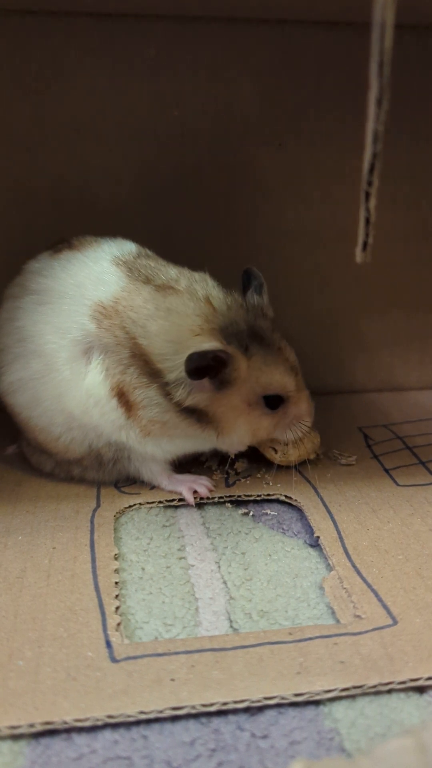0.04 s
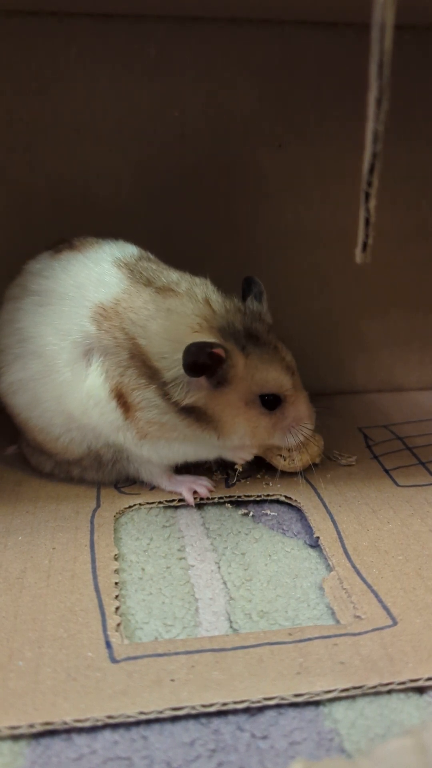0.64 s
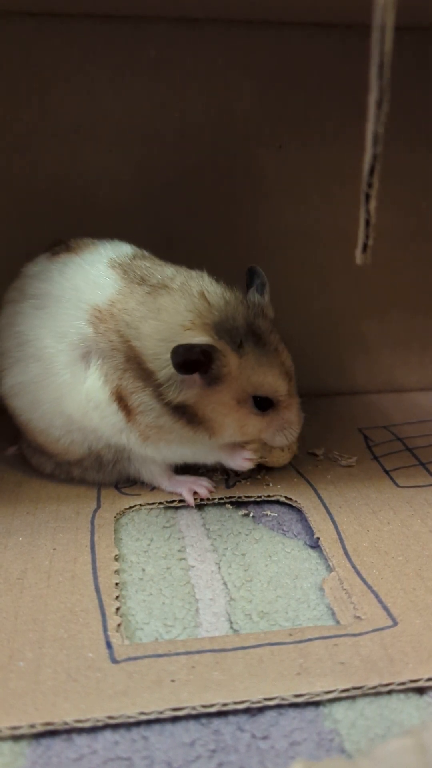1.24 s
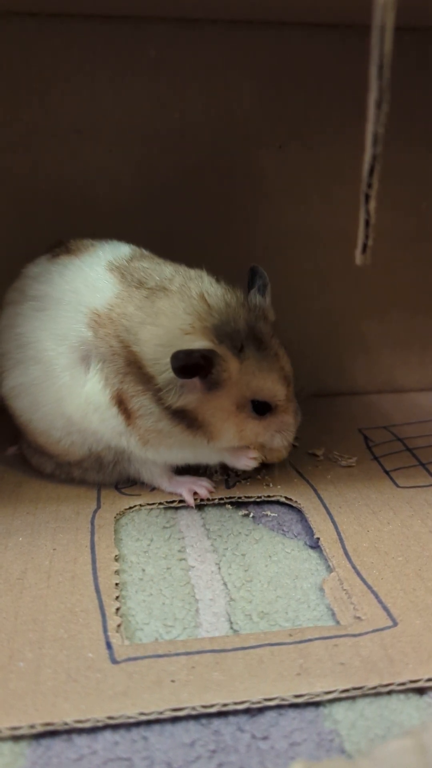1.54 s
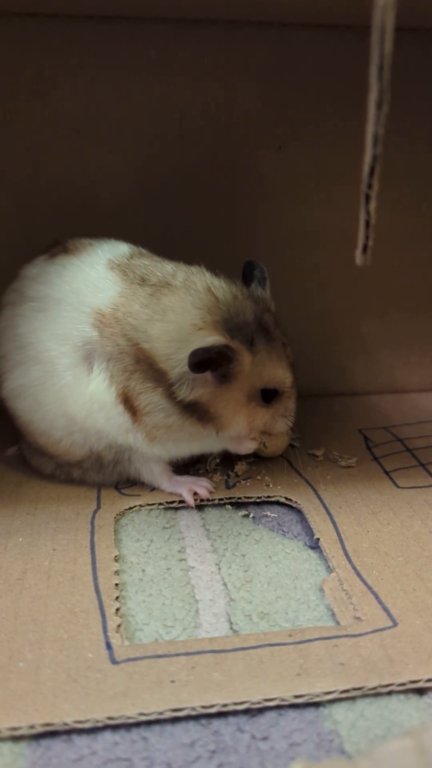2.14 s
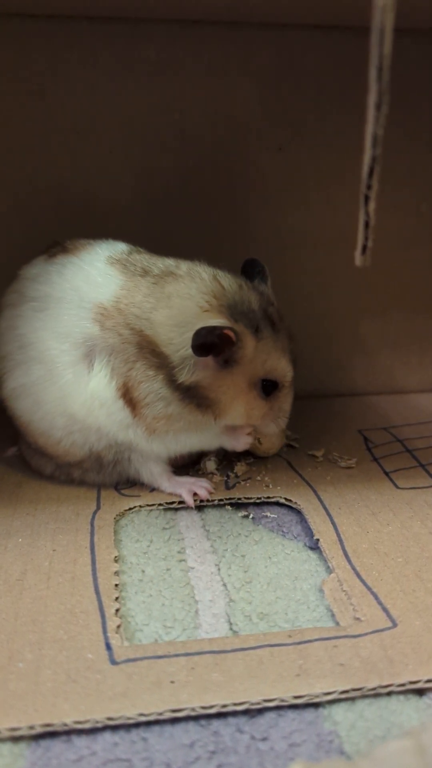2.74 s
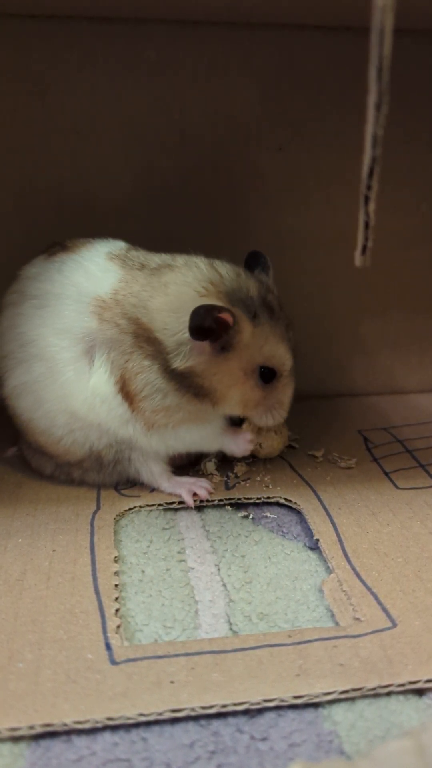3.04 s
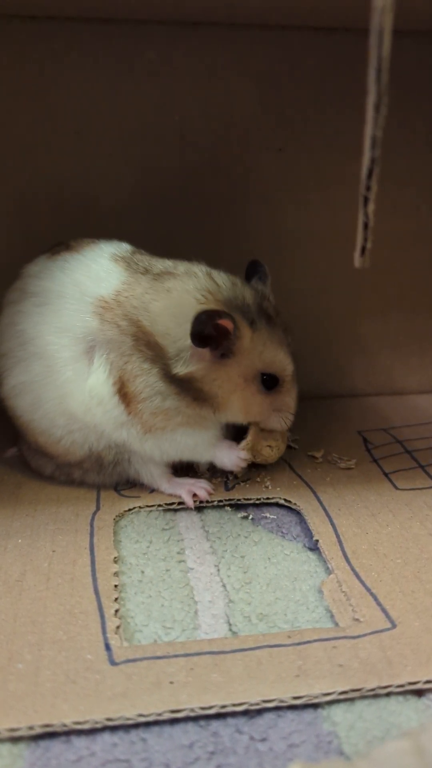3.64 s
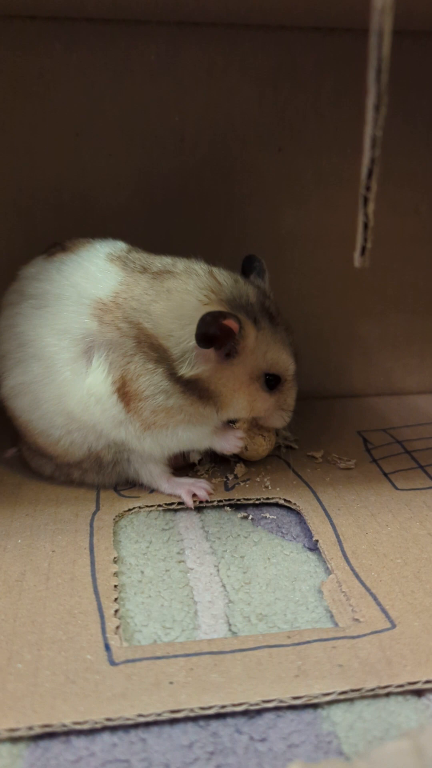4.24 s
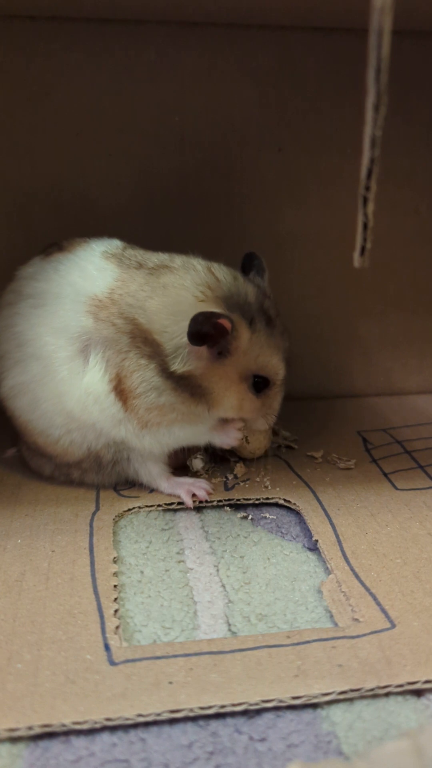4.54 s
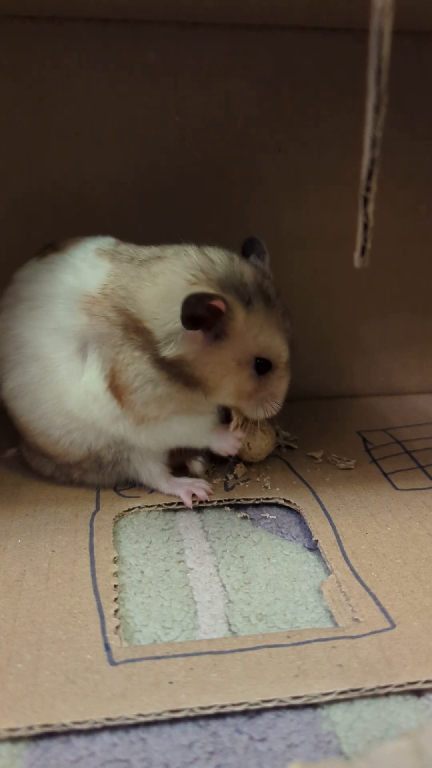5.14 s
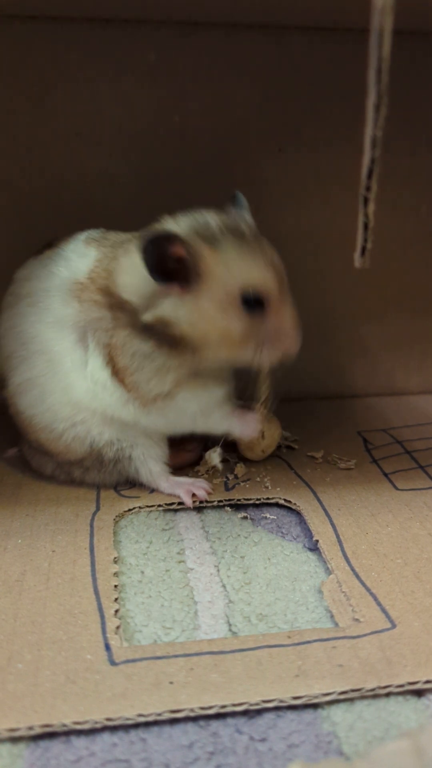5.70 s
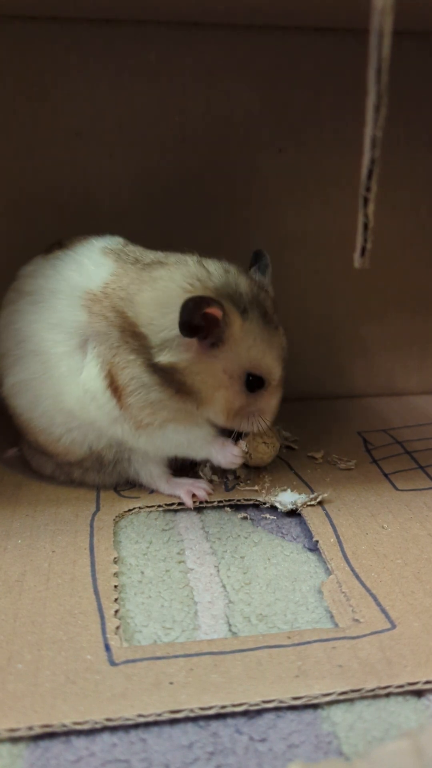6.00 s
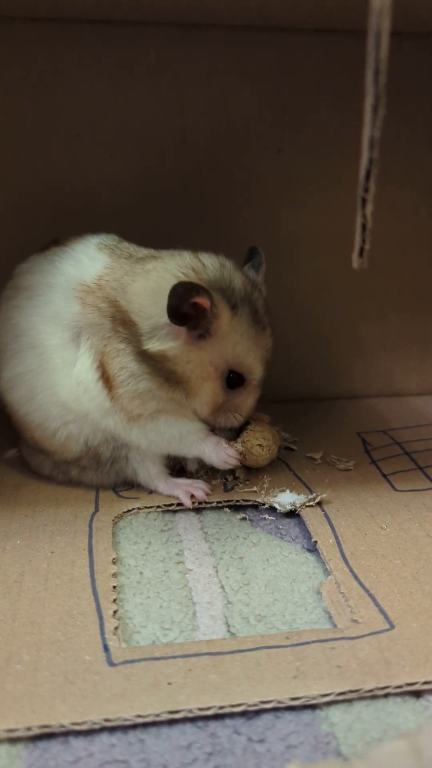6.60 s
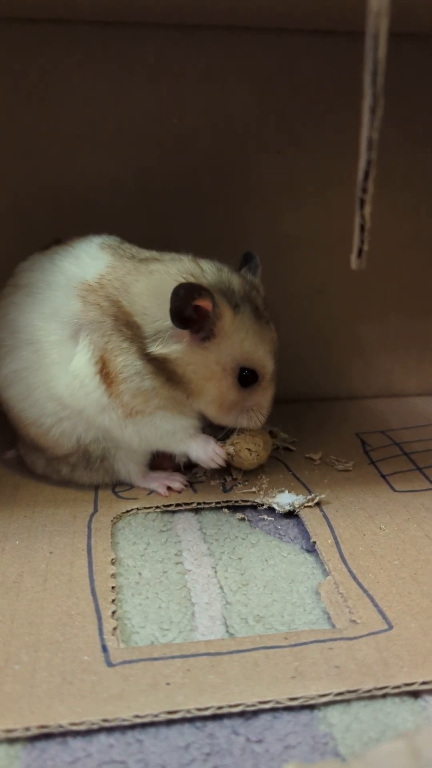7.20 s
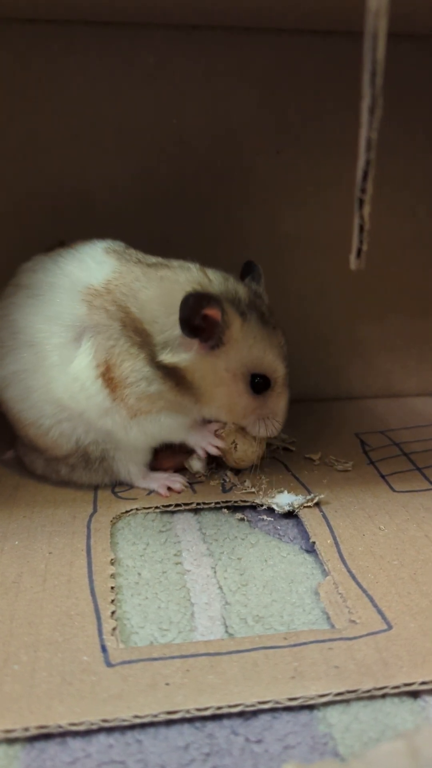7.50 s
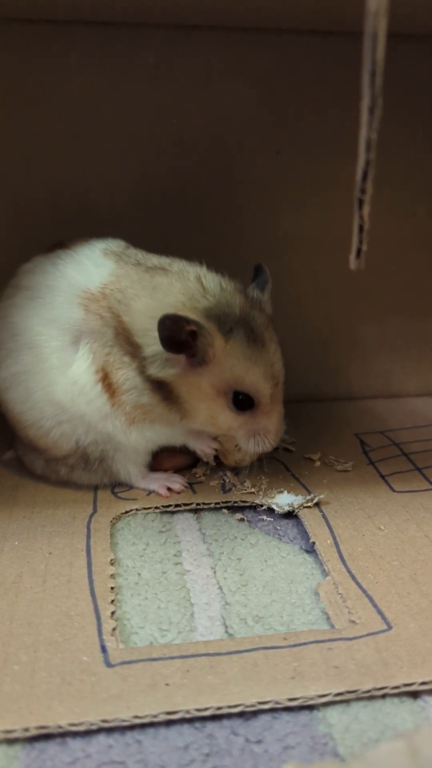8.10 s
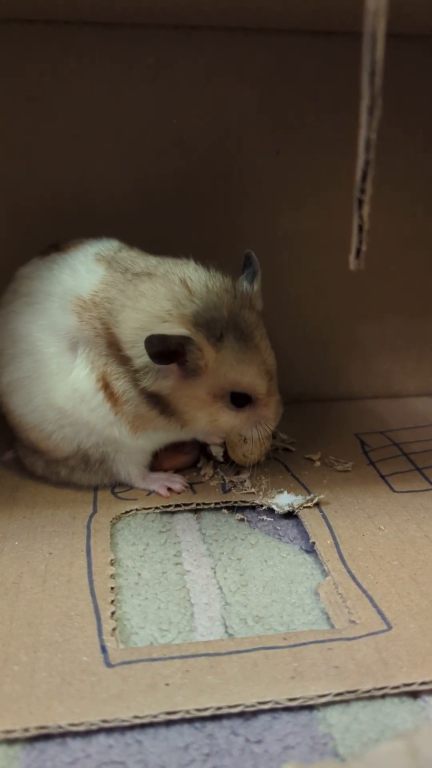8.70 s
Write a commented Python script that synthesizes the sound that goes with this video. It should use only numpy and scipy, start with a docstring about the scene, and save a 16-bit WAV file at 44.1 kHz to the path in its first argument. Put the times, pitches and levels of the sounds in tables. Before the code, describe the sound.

A hamster gnaws a peanut shell inside a cardboard box, close to the microphone. Quick, irregular cracks and crunching clicks mix with light tooth scrapes and soft knocks of the nut on the cardboard. A little past halfway comes the loudest snap with a thump, then the nibbling turns sparser, with scuffs and taps. A faint low hum fills the quiet room.

```python
"""A hamster gnaws a peanut inside a cardboard box, close to a two-port microphone in a quiet room.
Brittle fracture under its teeth excites the shell's resonances as cracks, rasps and crumbs.
The nut rubs and knocks on the floor, driving the cardboard's bending modes, and the animal's
shifting weight makes the lowest modes rumble. Box and room add short reflections,
and a gentle gain control lowers the level after loud snaps."""
import sys
import numpy as np
from scipy import signal
from scipy.fft import rfft, irfft, next_fast_len
from scipy.io import wavfile
from scipy.ndimage import uniform_filter1d

SR = 44100
rng = np.random.default_rng(int(sys.argv[2]) if len(sys.argv) > 2 else 0)


def wrap_up_sound(samples):
    """Save the sound to the file named by the first command line argument, as 16-bit audio."""
    columns = np.atleast_2d(samples).T
    # keep every value between -1 and 1, then stretch to whole-number steps
    tamed = np.clip(columns, -1, 1)
    steps = np.round(tamed * 32767).astype(np.int16)
    wavfile.write(sys.argv[1], SR, steps)


N = 394694
FFT_SIZE = next_fast_len(N, real=True)


def from_db(db):
    """Decibels to amplitude ratio."""
    return 10 ** (np.asarray(db) / 20)


def rms_one(x):
    """Normalisation to unit rms."""
    return x / np.sqrt(np.mean(x ** 2) + 1e-20)


def at_hz(points, hz):
    """Interpolation on a log-frequency axis."""
    f, value = np.transpose(points)
    return np.interp(np.log(hz + 1e-9), np.log(f), value)


def cut(x, hz, kind, order=2):
    """Butterworth filtering."""
    sections = signal.butter(order, np.clip(hz, 10, SR * 9 / 20), kind, fs=SR, output="sos")
    return signal.sosfilt(sections, x + 1e-18)


def resonate(x, resonances):
    """Modal superposition: damped resonators in parallel, with alternating signs."""
    out = 0
    for k, (hz, width, db) in enumerate(resonances):
        r = np.exp(-np.pi * width / SR)
        poles = [1, -2 * r * np.cos(2 * np.pi * hz / SR), r * r]
        ring = (1 - r * r) / 2 * signal.lfilter([1, 0, -1], poles, x + 1e-18)
        out = out + (-1) ** k * from_db(db) * ring
    return out


def evened(x, span_s):
    """Normalisation of the running rms, keeping the faster detail."""
    size = max(int(span_s * SR), 3)
    power = uniform_filter1d(uniform_filter1d(np.mean(np.atleast_2d(x) ** 2, axis=0), size), size)
    return x / np.sqrt(np.maximum(power, 0) + 1e-5 * np.mean(x ** 2))


def add(track, start_s, sound):
    """Superposition of a sound on a track."""
    i = max(round(start_s * SR), 0)
    track[..., i:i + sound.shape[-1]] += sound[..., :N - i]


def grains(per_s, spread_db):
    """Poisson process: random impulses, mostly small, a few large."""
    clicks = np.zeros(N)
    chance, size, sign = rng.random((3, N))
    born = chance < per_s / SR
    size_db = spread_db * np.minimum(-np.log(size[born] + 1e-9), 4)
    clicks[born] = from_db(size_db) * np.sign(sign[born] - .5)
    return clicks


# Background spectrum: (frequency [Hz], relative spectral level [dB])
ROOM_SPECTRUM = [(25, -22), (55, -3.5), (90, -8.5), (140, -13.5), (220, -31.5), (420, -24.5), (750, -34),
                 (1300, -35.5), (2200, -33), (4000, -40.5), (8000, -44), (16000, -49)]

def room_tone(level_db=-76.5, coherent_hz=900):
    """Diffuse field: the faint room noise is coherent between the ports only at long wavelengths."""
    hz = np.arange(FFT_SIZE // 2 + 1) * SR / FFT_SIZE
    mid, side = rfft(rng.standard_normal((2, FFT_SIZE))) * from_db(at_hz(ROOM_SPECTRUM, hz))
    coherence = 1 / (1 + (hz / coherent_hz) ** 2)
    tone = irfft(np.sqrt(1 + coherence) * mid + np.sqrt(1 - coherence) * side * [[1], [-1]], FFT_SIZE)
    return from_db(level_db) * rms_one(tone[:, :N])


# Bouts of gnawing and handling: (start [s], duration [s], load on the floor [dB])
ACTIVITY = [(0.0, 1.7, -58), (1.74, 1.663, -60), (3.69, 1.09, -60), (4.853, 0.42, -59.5), (5.36, 0.3, -66),
            (5.71, 0.25, -62.5), (6.333, 0.14, -72), (6.778, 0.21, -61), (7.46, 0.61, -61),
            (8.32, 1.03, -61.5)]

def bouts(levels_db, attack_s=.02, release_s=.029):
    """Amplitude envelope: each bout rises linearly, holds and decays exponentially."""
    t = np.arange(0, N, 44) / SR
    shapes = []
    for (start, length, _), db in zip(ACTIVITY, levels_db):
        rise = np.clip((t - start) / attack_s + .5, 0, 1)
        decay = np.exp(-np.maximum(t - start - length, 0) / release_s)
        shapes.append(from_db(db) * rise * decay)
    return np.interp(np.arange(N) / SR, t, np.max(shapes, axis=0))


# Work on the nut: (time [s], rubbing on cardboard [dB], teeth on shell [dB], rustle [dB])
WORK_LEVELS = [(0.0, -68, -71.5, -98), (0.97, -71.5, -75, -94.5), (1.12, -76, -75, -89),
               (1.54, -75, -76.5, -98), (1.72, -73, -77, -99), (2.22, -82.5, -80, -101),
               (2.44, -75.5, -71.5, -85.5), (3.24, -71, -76.5, -94), (3.49, -89, -81.5, -101),
               (4.01, -79, -91.5, -100), (4.41, -75.5, -86, -99), (4.88, -85.5, -94, -100),
               (5.08, -69, -86, -96.5), (5.53, -84, -91, -99), (5.86, -72, -88.5, -100),
               (6.11, -91, -100, -101), (6.81, -81.5, -99, -101), (6.98, -66, -95, -96.5),
               (7.23, -85.5, -110, -104.5), (7.9, -72, -80.5, -90), (8.13, -79.5, -93, -100),
               (8.95, -74.5, -77.5, -100.5)]

def effort(rest_db=-9):
    """Amplitude modulation: gains of rubbing, teeth and rustle; the first two ease between bouts."""
    times, *curves_db = np.transpose(WORK_LEVELS)
    rubbing, teeth, rustle = (from_db(np.interp(np.arange(N) / SR, times, db)) for db in curves_db)
    busy = np.maximum(bouts(np.zeros(len(ACTIVITY))), from_db(rest_db))
    return busy * rubbing, busy * teeth, rustle


# Resonances of the nut's cavity, wall and fibres: (frequency [Hz], bandwidth [Hz], gain [dB])
HOLLOW_MODES = [(744, 360, -5.5), (1250, 240, -2.5), (1740, 290, -2)]
WALL_MODES = [(2240, 380, 3), (2780, 650, 1.5), (3137, 1000, 0), (3690, 430, -2.5), (4830, 790, -12)]
SNAP_MODES = [(4850, 350, -1), (6600, 2000, -6), (8500, 1300, 1), (11500, 4700, -1), (13500, 2600, 1.5)]

def shell_parts(force, grip=1):
    """Forced vibration: the nut's hollow, wall and fibres respond; the grip scales their frequencies."""
    parts = (HOLLOW_MODES, WALL_MODES, SNAP_MODES)
    return np.array([resonate(force, np.array(modes) * [grip, 1, 1]) for modes in parts])


def radiated(parts, bands_hz=((650, 1850), (1850, 3850), (4000, 19000))):
    """Band-limited radiation: hollow, wall and fibres each sound mainly in their own range."""
    return [cut(x, band, "band") for x, band in zip(parts, bands_hz)]


def grit(per_s, spread_db, hollow_db):
    """Microfracture: a stream of tiny breaks excites the shell's body and its bright fibres."""
    hollow, wall, snap = (evened(x, .033) for x in radiated(shell_parts(grains(per_s, spread_db))))
    return rms_one(wall + from_db(hollow_db) * hollow), snap


def rasp(teeth, rustle, rustle_db=-4.5):
    """Friction noise: teeth and claws rub lightly on the shell while the nut is held."""
    body, snap = grit(per_s=6600, spread_db=6, hollow_db=-4.5)
    return teeth * body + rustle * from_db(rustle_db) * cut(snap, 5200, "high")


# Bending modes of the floor in low, middle and high groups:
# (frequency [Hz], gain [dB], free decay T60 [s], right minus left [dB])
CARDBOARD_MODES = [
    [(193, -3, 0.2, 2.5), (263.5, -1.5, 0.25, 1)],
    [(325, -1, 0.15, 0.5), (451, 2, 0.092, 3.5), (469.7, -3, 0.029, 1.5), (571, -3.5, 0.093, -0.5)],
    [(665, -5.5, 0.062, -2), (727.3, 1, 0.1, -0.5), (763.5, 3.5, 0.061, 7.5), (913.7, -7.5, .06, 6),
     (947, -5.5, 0.075, 9.5), (1130, -21, 0.05, -3.5), (1490, -22, 0.06, 2)],
]

def scuffs(rubbing, level_db=6, damping=1.5, db_per_octave=-5, soft_hz=2400):
    """Stick-slip friction: dragging nut and paws excite the floor's modes, damped by the contact."""
    out = np.zeros((2, N))
    slips = cut(grains(per_s=130, spread_db=5.5), soft_hz, "low")
    for k, (hz, db, t60, right_db) in enumerate(sum(CARDBOARD_MODES, [])):
        width = damping * np.log(1000) / (np.pi * t60)
        ring = resonate(slips, [(hz, width, db + db_per_octave * np.log2(hz))])
        out += (-1) ** k * from_db(np.array([[-1], [1]]) * right_db / 2) * ring
    return rubbing * from_db(level_db) * evened(out, .08)


# Lowest floor modes: (frequency [Hz], bandwidth [Hz], gain [dB])
SWAY_MODES = [(53.9, 7.7, 3), (79.6, 35, -0.5)]
DRUM_MODES = [(136.3, 22, 0)]
# A paw or the body comes down: (time [s], sway level [dB], drum level [dB])
FOOTFALLS = [(0.13, -52.5, -74), (0.17, -72, -48), (0.34, -62, -48.5), (0.541, -66.5, -50),
             (0.77, -65, -49.5), (0.9, -50.5, -58), (2.198, -58.5, -51.5), (2.84, -50.5, -47),
             (2.949, -55.5, -65), (3.218, -58, -50), (3.7, -53.5, -58), (4.229, -63, -60),
             (4.44, -52.5, -72), (4.62, -51, -74), (5.14, -43.5, -53.5), (5.259, -69, -52),
             (5.91, -71, -57), (7.019, -48.5, -46), (7.679, -57.5, -56.5), (8.11, -45, -62),
             (8.51, -72, -48)]

def rumble(load_db=(2, -1.5), rest_db=(-75, -89), apart_db=-16.5, rise_s=.029):
    """Random forcing: the moving animal drives the floor's sway and drum modes, more at each step."""
    t = np.arange(SR // 3) / SR
    steps = np.zeros((2, N))
    for start, *levels in FOOTFALLS:
        add(steps, start, np.outer(from_db(levels), t / rise_s * np.exp(1 - t / rise_s)))
    load = bouts([db for _, _, db in ACTIVITY])
    moving = np.maximum(np.outer(from_db(load_db), load), from_db(rest_db)[:, None])
    sway_gain, drum_gain = np.hypot(moving, steps)
    common, apart, taps = rng.standard_normal((3, N))
    push = common + from_db(apart_db) * apart * [[1], [-1]]   # slightly unlike at the two ports
    sway = cut(cut(resonate(push, SWAY_MODES), 39, "high", order=4), 120, "low", order=4)
    drum = cut(cut(resonate(taps, DRUM_MODES), 90, "high"), 130, "low", order=3)
    return sway_gain * evened(sway, .057) + drum_gain * evened(drum, .15)


def crumbs(teeth, level_db=13.5, snap_db=-28.5, break_s=.006):
    """Acoustic emission: flakes break off at random, louder the harder the teeth work."""
    t = np.arange(SR // 25) / SR
    bursts = signal.fftconvolve(np.abs(grains(per_s=12, spread_db=6)), np.exp(-t / break_s))[:N]
    hollow, wall, snap = radiated(shell_parts(bursts * rng.standard_normal(N)))
    return teeth * from_db(level_db) * (hollow + wall / 2 + from_db(snap_db) * snap)


def knock_levels(db, hardness_db, low_db=-6.5, low_loss=.2):
    """Contact stiffness: of the low, middle and high modes, a hard contact favours the high."""
    return db + low_db - low_loss * hardness_db, db, db + hardness_db


# The nut strikes the floor: (time [s], level [dB], hardness as high-mode boost [dB])
NUT_IMPACTS = [(0.1207, -62.5, 9.5), (0.1735, -55.5, 4.5), (0.234, -72, 26), (0.3286, -63.5, 6.5),
               (0.3771, -67.5, 14.5), (0.4305, -57.5, -5), (0.768, -62, -3), (0.822, -57, 12.5),
               (0.961, -60, 7.5), (1.2575, -61, -5.5), (1.3413, -54, -1), (1.3945, -61, -1.5),
               (1.5118, -53.5, 3.5), (1.6239, -46, -3), (1.926, -66, -7), (2.2003, -63, -5.5),
               (2.2533, -59.5, 4.5), (2.398, -57.5, -9), (2.4736, -67.5, -3), (2.5461, -63, 5),
               (2.7953, -53, 0), (2.844, -41.5, -6), (3.0541, -68, 11.5), (3.1961, -66, 10.5),
               (3.697, -59.5, -6.5), (3.796, -68, -5), (3.9962, -69, -0.5), (4.112, -66, 3),
               (4.223, -63.5, 0.5), (4.3894, -61, -6), (4.5455, -58, -4.5), (4.8656, -55, -3),
               (5.1169, -31.5, 5), (5.2557, -51.5, 3.5), (5.559, -71.5, 0), (5.7106, -57, -6.5),
               (5.9086, -57.5, -2), (5.9597, -64.5, 7.5), (6.7855, -65.5, -6), (6.9092, -57.5, -1.5),
               (7.0236, -41, -1), (7.4646, -54.5, -6.5), (7.6727, -59, -0.5), (8.111, -60, -1.5),
               (8.3147, -43, 0), (8.51, -53.5, 3)]

def knocks(vary_db=3.5, build_s=.0006, trim_db=(-.3, -.3, -.5), crush_db=-6, crush_s=.015):
    """Impact excitation: the cardboard crushes with a thud and rings, differently at each spot."""
    t = np.arange(SR // 5) / SR
    onset = 3 * SR // 100   # the first 30 ms set the level
    out = np.zeros((2, N))
    for group, modes in enumerate(CARDBOARD_MODES):
        hz, db, t60, right_db = np.transpose(modes)
        rings = np.exp(2j * np.pi * np.outer(hz, t)) * from_db(-60 * t / t60[:, None])
        rings *= 1 - np.exp(-t / build_s)   # the bending wave needs time to spread
        sides = from_db(np.outer([-1, 1], right_db) / 2)
        crushes = rng.standard_normal((len(NUT_IMPACTS), len(t))) * np.exp(-t / crush_s)
        thuds = cut(crushes, (hz.min(), hz.max()), "band")
        for (start, knock_db, hardness_db), thud in zip(NUT_IMPACTS, thuds):
            strength, phase = rng.standard_normal((2, len(hz)))
            weights = sides * from_db(db + vary_db * strength) * np.exp(1j * phase / 2)
            ringing = np.imag(weights @ rings)
            sound = ringing / ringing[:, :onset].std() + from_db(crush_db) * thud / thud[:onset].std()
            gain = from_db(knock_levels(knock_db, hardness_db)[group] + trim_db[group])
            add(out, start, gain * sound / sound[:, :onset].std())
    return out


def bounce(hz=59, t60=.6, build_s=.0053, level_db=2):
    """Free vibration: each knock sets the whole floor panel swinging in its lowest mode."""
    t = np.arange(SR // 2) / SR
    swing = np.sin(2 * np.pi * hz * t) * from_db(-60 * t / t60) * (1 - np.exp(-t / build_s))
    out = np.zeros(N)
    for start, db, hardness_db in NUT_IMPACTS:
        add(out, start, from_db(knock_levels(db, hardness_db)[0] + level_db) * swing)
    return out


# The shell splits: (time [s], hollow level [dB], wall level [dB], snap level [dB])
FRACTURES = [(0.173, -57, -51, -71), (0.2315, -41, -20.5, -34.5), (0.2382, -32.5, -27, -27.5),
             (0.3241, -52, -40, -54.5), (0.6491, -76, -48.5, -66), (0.6712, -63, -37.5, -47),
             (0.6764, -53, -66, -41.5), (0.6987, -39, -33, -59), (0.9392, -59, -42, -46),
             (0.9684, -71, -44.5, -60), (1.0605, -58, -43.5, -65), (1.082, -50, -47.5, -60.5),
             (1.3419, -42.5, -34, -42), (1.4832, -53.5, -52, -78.5), (1.5135, -52, -52, -72),
             (1.8634, -62, -48.5, -70.5), (1.894, -62.5, -51, -76), (1.9914, -65.5, -58, -87),
             (2.2515, -35.5, -26, -29), (2.3647, -61, -52.5, -82), (2.3964, -38, -40, -67.5),
             (2.5454, -43.5, -41.5, -47), (2.5828, -58, -42, -59), (2.6069, -50.5, -45, -63.5),
             (2.6671, -43, -43, -60.5), (2.7949, -49, -43.5, -47), (2.8399, -45, -41.5, -59.5),
             (3.0571, -51, -49, -71), (3.9127, -64.5, -58.5, -65.5), (4.1115, -74, -63, -75.5),
             (4.219, -59.5, -52.5, -72), (4.357, -71.5, -68.5, -76), (4.39, -71, -72, -86),
             (4.5471, -70, -52.5, -75), (4.686, -74, -75, -66.5), (4.866, -56, -54.5, -82),
             (5.0636, -57.5, -54.5, -68.5), (5.116, -29.5, -22, -25.5), (5.119, -34, -35.5, -30),
             (5.1365, -50, -40.5, -43), (5.144, -46.5, -51, -42.5), (5.2509, -52.5, -52.5, -68.5),
             (5.7107, -78.5, -69, -76.5), (5.907, -44.5, -50, -72.5), (5.9596, -49, -55, -80),
             (5.9786, -54.5, -58, -90), (5.994, -57, -67, -88), (7.0231, -65, -44.5, -45.5),
             (7.447, -54, -53.5, -78), (7.7834, -56.5, -58, -79.5), (8.1282, -63, -59, -88),
             (8.1578, -58, -55, -70), (8.3162, -52.5, -59, -78), (8.5462, -54.5, -50.5, -83)]
# Colour of the splinters: (hollow gain [dB], wall gain [dB], snap gain [dB])
SPLINTER_GAINS = (2.0, -5, 0)

def cracks(tear_s=.0006, splinter_db=-19, splinter_s=.014, grip_spread=.06, trim_db=(-.5, 0, 0)):
    """Brittle fracture: a brief burst of tearing fibres and a trail of splinters ring the shell."""
    t = np.arange(SR // 30) / SR
    responses = []
    for _ in FRACTURES:
        tear, splinters, sizes = rng.standard_normal((3, len(t)))
        force = tear * (t / tear_s) * np.exp(1 - t / tear_s)   # the split runs fast, then stalls
        trail = splinters * from_db(splinter_db + 2 * sizes) * np.exp(-t / splinter_s)
        grip = np.exp(grip_spread * rng.uniform(-1, 1))
        splintering = from_db(SPLINTER_GAINS)[:, None] * shell_parts(trail, grip)
        responses.append(shell_parts(force, grip) + splintering)
    onset = 3 * SR // 1000   # the first 3 ms set the level
    out = np.zeros(N)
    for part, sounds in enumerate(radiated(np.swapaxes(responses, 0, 1))):
        for (start, *levels), sound in zip(FRACTURES, sounds):
            onset_rms = np.sqrt(np.mean(sound[:onset] ** 2))
            add(out, start, from_db(levels[part] + trim_db[part]) * sound / onset_rms)
    return out


# A tooth or claw drags on the shell: (time [s], duration [s], shell level [dB], fibre level [dB])
GNAWS = [(0.357, 0.023, -59, -75.5), (0.508, 0.16, -73, -94.5), (0.788, 0.079, -67, -85),
         (0.892, 0.096, -64.5, -88), (0.955, 0.16, -61.5, -85), (1.465, 0.021, -64, -84),
         (1.564, 0.042, -66.5, -91), (1.618, 0.012, -64, -95), (1.668, 0.034, -68.5, -98),
         (2.58, 0.06, -70.5, -88), (3.17, 0.12, -65.5, -93.5), (3.31, 0.15, -74, -99),
         (3.707, 0.054, -62.5, -86.5), (4.593, 0.021, -65.5, -89), (5.749, 0.021, -69, -93),
         (5.965, 0.052, -72, -94), (6.78, 0.036, -72, -88.5), (6.899, 0.031, -73.5, -86.5),
         (6.933, 0.1, -74, -83.5), (7.054, 0.18, -102, -87.5), (7.51, 0.055, -65.5, -82.5),
         (7.666, 0.034, -67.5, -85), (7.728, 0.15, -82, -93), (7.894, 0.03, -66.5, -85.5),
         (8.108, 0.041, -70.5, -91), (8.329, 0.093, -71, -95), (8.561, 0.055, -69, -89.5),
         (8.706, 0.023, -69.5, -88.5), (8.875, 0.033, -63.5, -80.5)]

def tooth_pressure():
    """Contact loading: shell and fibre gains follow a half sine as the tooth digs in and lets go."""
    pressure = np.zeros((2, N))
    for start, length, *levels in GNAWS:
        swell = np.sin(np.linspace(0, np.pi, int(length * SR)))
        add(pressure, start, np.outer(from_db(levels), swell))
    return pressure


def strokes(on_shell, on_fibres, shell_db=5.5, fibre_db=3):
    """Abrasion: the shell crumbles and its fibres tear under the dragging tooth."""
    body, snap = grit(per_s=3000, spread_db=7, hollow_db=-1.5)
    return from_db(shell_db) * on_shell * body + from_db(fibre_db) * on_fibres * snap


# Standing waves in the box: (frequency [Hz], bandwidth [Hz], gain [dB])
AIR_MODES = [(1264, 26, 1), (1382, 60, -1.5), (1504, 50, 0), (1672, 55, -1), (2300, 130, 1),
             (2640, 86, -5.5), (3013, 75, -6)]

def box(x, echoes_s=(.0026, .0031), wall_db=-6.5, ring_db=-16.5):
    """Cavity resonance and early reflection: the air rings and the walls echo once to each port."""
    out = np.tile(x + from_db(ring_db) * resonate(x, AIR_MODES), (2, 1))
    for port, delay_s in zip(out, echoes_s):
        add(port, delay_s, from_db(wall_db) * x)
    return out


# Decay of the room: (frequency [Hz], T60 [s])
REVERB_TIMES = [(500, .2), (1500, .23), (3000, .19), (6000, .15), (14000, .125)]

def room(x, build_s=.003):
    """Reverberation: a dense exponential tail, shorter in the treble, different at each port."""
    t = np.arange(SR // 2) / SR
    edges_hz = np.geomspace(150, 19000, 9)
    white = rng.standard_normal((2, 2, len(t)))
    tail = 0
    for k, band in enumerate(zip(edges_hz, edges_hz[1:])):
        t60 = at_hz(REVERB_TIMES, np.sqrt(np.prod(band)))
        tail = tail + cut(white[k % 2], band, "band") * from_db(-60 * t / t60)
    response = rms_one(tail * (1 - np.exp(-t / build_s))) / np.sqrt(len(t))
    return signal.fftconvolve(x[None], response, axes=1)[:, :N]


def ports(x, shadow_hz=3800, leak_db=-20, lag_s=.00019):
    """Acoustic shadow: the right port faces away, so it hears later and misses most of the treble."""
    left, right = x
    hz = np.arange(FFT_SIZE // 2 + 1) * SR / FFT_SIZE
    shadow = np.sqrt(1 / (1 + (hz / shadow_hz) ** 7) + from_db(leak_db) ** 2)
    delay = np.exp(-2j * np.pi * hz * lag_s)
    return np.array([left, irfft(rfft(right, FFT_SIZE) * shadow * delay, FFT_SIZE)[:N]])


def gain_control(x, threshold_db=-38.5, squeeze=.13, release_db_per_s=55.5, smooth_s=.16):
    """Dynamic compression: loud snaps turn the gain down a little; it then creeps back."""
    power = uniform_filter1d(np.mean(x ** 2, axis=0), SR // 300)
    level_db = 10 * np.log10(np.maximum(power, 0) + 1e-12)
    fall_db = release_db_per_s * np.arange(N) / SR
    peak_db = np.maximum.accumulate(level_db + fall_db) - fall_db
    reduction_db = squeeze * np.maximum(peak_db - threshold_db, 0) + 1e-9
    r = np.exp(-1 / (smooth_s * SR))
    return x * from_db(-signal.lfilter([1 - r], [1, -r], reduction_db))


def scene(drag_db=1, shell_room_db=-14, floor_room_db=-18):
    """Superposition: shell, cardboard and their reflections add at the ports, over the room noise."""
    rubbing, teeth, rustle = effort()
    on_shell, on_fibres = tooth_pressure()
    shell = cracks() + strokes(on_shell, on_fibres) + rasp(teeth, rustle) + crumbs(teeth)
    dragging = from_db(drag_db) * on_shell   # each stroke also drags the nut over the cardboard
    floor = knocks() + scuffs(np.hypot(rubbing, dragging))
    reverb = room(from_db(shell_room_db) * shell + from_db(floor_room_db) * floor.mean(axis=0))
    return ports(box(shell) + floor + reverb + rumble() + bounce()) + room_tone()


def record(dry, cutoff_hz=16000):
    """Band limiting: a steep elliptic low-pass follows the gain control."""
    lowpass = signal.ellip(10, .1, 70, cutoff_hz, fs=SR, output="sos")
    return signal.sosfilt(lowpass, gain_control(dry))


dry = scene()
out = record(dry)
wrap_up_sound(out)
```